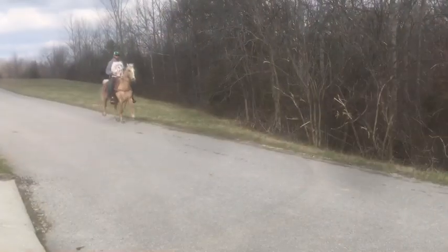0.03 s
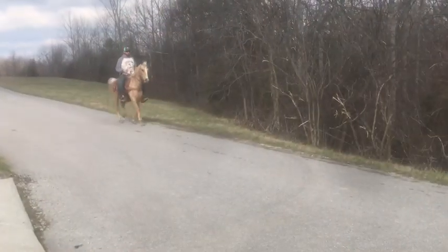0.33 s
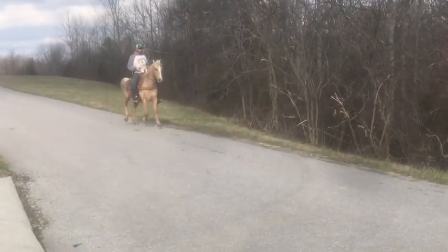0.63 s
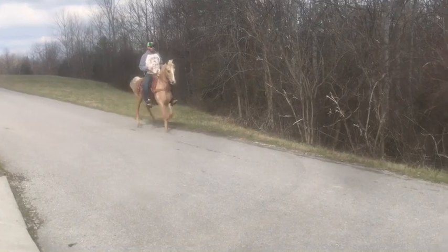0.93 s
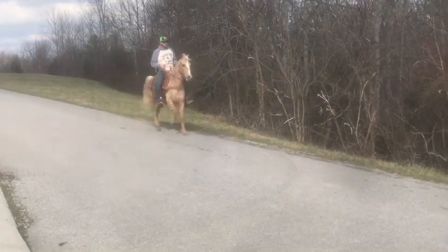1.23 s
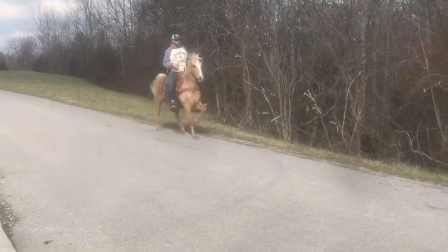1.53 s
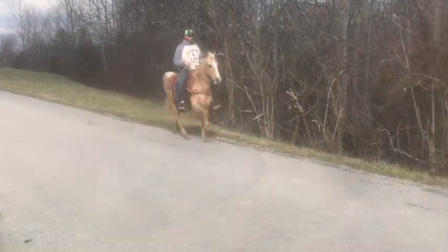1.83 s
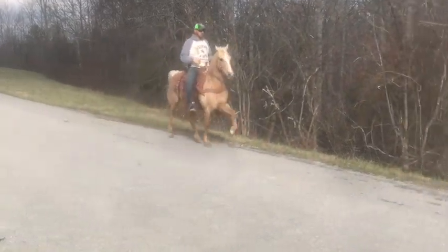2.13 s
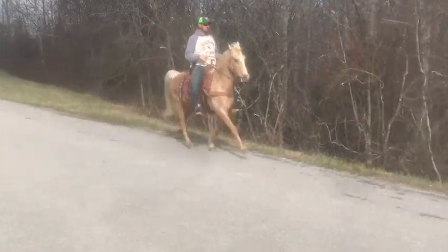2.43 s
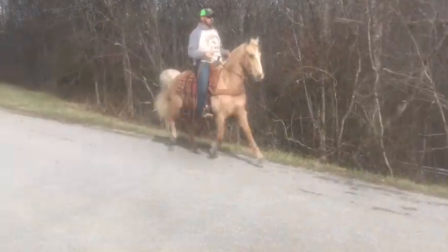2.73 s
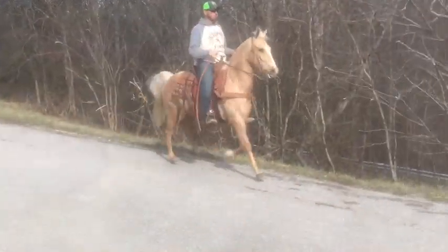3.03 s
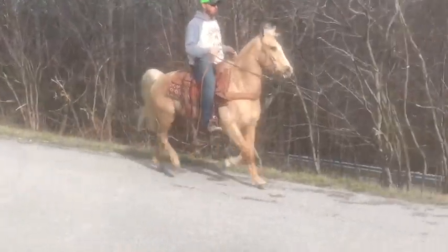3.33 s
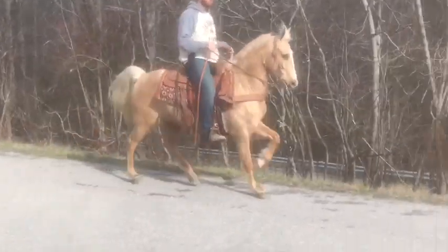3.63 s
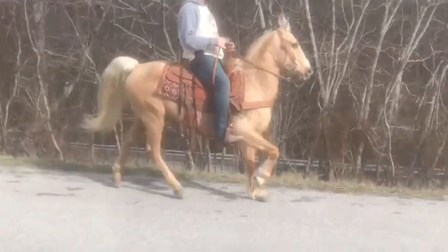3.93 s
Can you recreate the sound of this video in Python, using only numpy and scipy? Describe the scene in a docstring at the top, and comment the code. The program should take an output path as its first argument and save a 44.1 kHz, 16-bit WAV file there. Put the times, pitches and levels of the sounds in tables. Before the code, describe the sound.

A horse's hooves clip-clop at a quick, even pace on a paved road outdoors, growing louder as it approaches. Wind gusts buffet the microphone early on, then thin out, while harness and loose grit tick faintly between steps.

```python
"""A horse comes up an asphalt road at a quick, even gait; at first, gusts buffet the microphone.
Each hoof ticks down with its toe, scuffs, then slaps flat: a thud, a hollow cup of air, a ring of horn.
The wood beside the road answers; tack and loose grit tick between steps.
The gusts thin out, and the steps grow louder and drier until the horse is close by."""
import sys
import numpy as np
from scipy import signal
from scipy.fft import rfft, irfft, next_fast_len
from scipy.io import wavfile
from scipy.ndimage import uniform_filter1d

SR = 44100
rng = np.random.default_rng(int(sys.argv[2]) if len(sys.argv) > 2 else 0)


def master(y):
    """Save y as 16-bit WAV."""
    cut = np.clip(np.atleast_2d(y).T, -1, 1)
    pcm = np.round(cut * 32767)  # scale
    wavfile.write(sys.argv[1], SR, pcm.astype(np.int16))


N = 176400

# Spectrum of a hard snap: freq_hz, level_db
CRACK_SPECTRUM = [(300, -88), (1200, 0.5), (2600, 9), (4500, 2), (8000, -9), (10500, -21.5), (16000, -34)]
# Spectrum of crunching grit: freq_hz, level_db
GRIT_SPECTRUM = [(120, -29.5), (250, 3), (650, 0.5), (1300, 4), (2100, -11), (2700, -13), (7500, -40)]


def amp(db):
    """Decibels to gain."""
    return 10 ** (np.asarray(db) / 20)


def unit(x):
    """Scale to rms 1."""
    return x / np.sqrt(np.mean(x ** 2) + 1e-20)


def bin_gains(spectrum, size):
    """Gain per FFT bin, interpolated over log frequency."""
    freq_hz, level_db = np.transpose(spectrum)
    bin_hz = np.fft.rfftfreq(size, 1 / SR)
    return amp(np.interp(np.log(bin_hz + 1), np.log(freq_hz + 1), level_db))


def add(track, start_s, sound):
    """Mix a sound into a track."""
    i = int(np.clip(round(start_s * SR), 0, N))
    track[i:i + len(sound)] += sound[:N - i]


def coloured(x, spectrum):
    """Minimum-phase filter of unit energy."""
    size = 2048
    cepstrum = irfft(np.log(bin_gains(spectrum, size)))
    cepstrum[1:size // 2] *= 2
    cepstrum[size // 2 + 1:] = 0
    impulse = irfft(np.exp(rfft(cepstrum)))
    return signal.fftconvolve(x, impulse / np.linalg.norm(impulse))[:len(x)]


def noise(spectrum):
    """Steady coloured noise of rms 1."""
    return unit(irfft(rfft(rng.standard_normal(N)) * bin_gains(spectrum, N), N))


def fade(t, t60_s):
    """Exponential decay."""
    return np.exp(-np.log(1000) * t / t60_s)


def burst(t, t60_s):
    """Decaying white noise."""
    return rng.standard_normal(len(t)) * fade(t, t60_s)


def horse():
    """Steps and their echoes, drier as the horse nears."""
    # Hoof falls: toe_s, sole_s, tick_db, crack_db, thud_db, cup_db, horn_db, scuff_db,
    # thud_hz, cup_hz, horn_hz, horn_decay_s
    hoof_falls = [(.034, .0428, -34.5, -31, -34, -41, -24.5, -37.5, 202, 590, 962, 0.034),
                  (0.181, 0.186, -33, -34, -54, -62, -27.5, -44, 302, 706, 1310, 0.013),
                  (0.314, 0.318, -34, -29, -27.5, -52, -20.5, -35, 202, 645, 1320, 0.017),
                  (0.439, 0.4462, -30.5, -32, -50, -60, -47, -45, 300, 680, 1380, 0.018),
                  (0.5793, 0.5865, -41, -38, -44, -54, -34, -39, 200, 590, 920, 0.047),
                  (.713, 0.714, -33, -37, -26.5, -29, -33.5, -43, 265, 590, 1230, 0.041),
                  (0.8405, 0.8463, -35.5, -39, -24.5, -36, -24, -36.5, 318, 647, 931, 0.027),
                  (.953, .9556, -38, -36.5, -9.5, -28, -32.5, -39.5, 303, 644, 1310, 0.02),
                  (1.111, 1.1218, -42, -53, -31, -23, -20.5, -30, 403, 645, 970, 0.018),
                  (1.2548, 1.2572, -35.5, -30.5, -13.5, -28, -24, -41, 292, 613, 1199, 0.035),
                  (1.3577, 1.3717, -48, -50, -26.5, -29, -33.5, -37, 400, 613, 1290, 0.012),
                  (1.5073, 1.514, -31.5, -46, -15, -23.5, -28, -35, 267, 590, 1276, 0.011),
                  (1.611, 1.625, -40, -29.5, -27.5, -25.5, -16.5, -31.5, 201, 595, 1010, 0.013),
                  (1.77, 1.772, -31.5, -20, -20.5, -50, -18.5, -32, 283, 800, 1202, 0.034),
                  (1.873, 1.887, -36.5, -39, -30, -38, -36, -32.5, 225, 564, 1150, 0.025),
                  (2.0069, 2.021, -25, -33, -18, -38, -21.5, -35, 343, 697, 1480, 0.0086),
                  (2.155, 2.164, -39, -33.5, -25, -32, -22, -32.5, 230, 740, 900, 0.021),
                  (2.2904, 2.2918, -29.5, -26, -17, -30, -18.5, -30.5, 373, 790, 1090, 0.033),
                  (2.399, 2.4136, -31.5, -32, -34, -24, -37, -32, 348, 638, 910, 0.013),
                  (2.523, 2.529, -29.5, -33, -18, -23, -21.5, -29.5, 273, 714, 790, 0.0086),
                  (2.6765, 2.6863, -32.5, -35.5, -21.5, -23, -30, -29.5, 350, 626, 926, 0.026),
                  (2.8094, 2.8097, -23.5, -24, -12, -20.5, -20, -31.5, 291, 686, 1175, 0.019),
                  (2.9165, 2.9272, -32, -28.5, -23, -19, -32, -29.5, 404, 588, 1080, 0.0087),
                  (3.0678, 3.0702, -23.5, -33, -10, -18, -21, -29.5, 212, 687, 1130, 0.012),
                  (3.1675, 3.185, -33.5, -33.5, -15.5, -15, -19, -26, 277, 698, 910, 0.018),
                  (3.3276, 3.3316, -21, -21, -8, -15, -14.5, -31, 275, 640, 1176, 0.026),
                  (3.467, 3.4788, -24, -25, -16, -16.5, -20, -26, 348, 655, 995, .028),
                  (3.604, 3.6143, -30, -36, -13.5, -15.5, -18.5, -29.5, 271, 647, 1163, 0.022),
                  (3.7125, 3.7232, -35, -25.5, -16, -16, -10, -29, 195, 720, 1058, 0.016),
                  (3.8734, 3.8888, -16.5, -30.5, -9, -15.5, -13.5, -41, 310, 612, 1068, 0.03),
                  (3.987, 3.995, -38, -29.5, -18, -14.5, -22.5, -28.5, 360, 586, 980, 0.02)]
    far_echo_db, near_echo_db = -9, -15
    out = np.zeros(N)
    for toe_s, sole_s, *settings in hoof_falls:
        step = hoof_fall(sole_s - toe_s, *settings)
        echo_db = np.interp(toe_s, [0, N / SR], [far_echo_db, near_echo_db])
        add(out, toe_s, step)
        add(out, toe_s, amp(echo_db) * trees(step))
    return out


def hoof_fall(roll_s, tick_db, crack_db, thud_db, cup_db, horn_db, scuff_db, *tuning):
    """The toe ticks and sets the hoof ringing; roll_s later the sole slaps flat."""
    t = np.arange(SR // 10) / SR
    sole_t = np.maximum(t - roll_s, 0)
    toe_ring = hoof_body(t, *tuning, thud_db=7.5, cup_db=0, horn_db=0)
    toe = amp(tick_db - 3.5) * toe_ring * fade(t, t60_s=0.039)
    sole = hoof_body(sole_t, *tuning, thud_db, cup_db, horn_db)
    tick = amp(tick_db) * burst(t, t60_s=0.007)
    crack = amp(crack_db) * burst(sole_t, t60_s=0.013) * (sole_t > 0)
    return toe + sole + coloured(tick + crack, CRACK_SPECTRUM) + amp(scuff_db) * scuff(t, roll_s)


def hoof_body(t, thud_hz, cup_hz, horn_hz, horn_decay_s, thud_db, cup_db, horn_db):
    """Thud of the weight, air cupped under the sole, its blunt slap and the modes of the horn."""
    # Further hoof modes: pitch_hz, level_re_horn_db, decay_s
    overtones = [(1369, -3.5, 0.01), (1673, -11.5, 0.025), (2553, -11.5, 0.016)]
    thud_cycles, scatter_db, detune = 7, 1.5, 0.05
    thud = amp(thud_db) * ring(t, thud_hz, thud_cycles / thud_hz, attack_s=0.0025)
    cup = amp(cup_db) * ring(t, cup_hz, decay_s=0.023)
    slap = amp(horn_db + 2) * ring(t, pitch_hz=1026, decay_s=0.0041, attack_s=0.0002)
    horn = amp(horn_db) * ring(t, horn_hz, horn_decay_s)
    for pitch_hz, level_db, decay_s in overtones:
        pitch_draw, level_draw = rng.standard_normal(2)
        gain = amp(horn_db + level_db + scatter_db * level_draw)
        horn += gain * ring(t, pitch_hz * (1 + detune * pitch_draw), decay_s)
    return thud + cup + slap + horn


def ring(t, pitch_hz, decay_s, attack_s=0.0004):
    """One mode, choked ever faster as the hoof takes the weight."""
    load_exponent = 1.58
    choke = fade((t / decay_s) ** load_exponent, 0.65)
    return -np.sin(2 * np.pi * pitch_hz * t) * choke * (1 - np.exp(-t / attack_s))


def scuff(t, roll_s):
    """Grit crunches and fine sand scrapes, most once the sole is down."""
    grains_per_s, spread_db = 2600, 5
    toe_only_db, hold_s = -6, 0.0091
    sand_db, sand_top_hz = -16, 6100
    shape = (2, len(t))
    sizes = amp(spread_db * np.clip(rng.standard_normal(shape), -2, 2))
    hits = rng.random(shape) < grains_per_s / SR
    grains = sizes * hits * np.sign(rng.standard_normal(shape))
    release = fade(np.maximum(t - roll_s - hold_s, 0), t60_s=0.042)
    coarse, fine = unit(grains) * amp(toe_only_db * (t < roll_s)) * release
    sand = signal.lfilter(*signal.butter(2, sand_top_hz, fs=SR), coloured(fine, CRACK_SPECTRUM))
    return coloured(coarse, GRIT_SPECTRUM) + amp(sand_db) * sand


def trees(step):
    """Countless trunks each send back a faint copy of the step, blurred in pitch."""
    # Echo colour: freq_hz, level_db
    echo_spectrum = [(300, -11), (750, -4.5), (1100, -4), (1700, -4), (6000, -1)]
    trunks_per_s, build_s, blur_hz = 1500, 0.029, 191
    t = np.arange(SR // 2) / SR
    reflections = burst(t, t60_s=0.34) * (rng.random(len(t)) < trunks_per_s / SR)
    reflections *= 1 - np.exp(-(t / build_s) ** 2)
    blurred_power = uniform_filter1d(np.abs(rfft(step, len(t))) ** 2, int(blur_hz * len(t) / SR))
    echo = irfft(rfft(reflections / np.linalg.norm(reflections)) * np.sqrt(np.abs(blurred_power)))
    return coloured(echo, echo_spectrum)


def tack():
    """Small ticks and knocks of harness and saddle."""
    # Tack knocks: start_s, level_db
    knocks = [(.128, -40.5), (0.644, -38), (1.446, -38), (1.712, -33.5), (2.21, -39.5), (2.745, -36),
              (3.008, -33.5), (3.271, -29), (3.8186, -35.5), (3.8317, -38)]
    t60_s, tick_db = 0.032, -8.5
    out, t = np.zeros(N), np.arange(SR // 10) / SR
    for start_s, level_db in knocks:
        tick = amp(tick_db) * coloured(burst(t, t60_s), CRACK_SPECTRUM)
        knock = coloured(burst(t, t60_s), GRIT_SPECTRUM)
        add(out, start_s, amp(level_db) * (tick + knock))
    return out


def wind():
    """A breeze and short gusts buffet the microphone; the swirl gains in strong gusts."""
    # Breeze strength: time_s, level_db
    breeze = [(0, -40), (.9, -34.5), (1.4, -46), (2.2, -41.5), (2.7, -55.5), (3.2, -47.5), (3.7, -37.5),
              (3.95, -55.5)]
    # Gusts: centre_s, peak_db
    gusts = [(.037, -28), (0.292, -24), (0.519, -23.5), (.609, -24.5), (.804, -22.5), (.961, -28),
             (1.22, -32.5), (1.948, -28.5), (3.408, -36.5)]
    # Low buffeting: freq_hz, level_db
    rumble_spectrum = [(20, -32), (55, 1.5), (80, -2), (130, -7.5), (220, -20), (600, -92)]
    # Upper buffeting: freq_hz, level_db
    swirl_spectrum = [(60, -9), (150, 9.5), (320, -3), (600, -24), (1500, -91)]
    gust_sigma_s = 0.017
    strong_db, swirl_db, swirl_exponent = -16, -13.5, 1.1
    t = np.arange(N) / SR
    force = amp(np.interp(t, *np.transpose(breeze)))
    for centre_s, peak_db in gusts:
        gust = amp(peak_db) * np.exp(-((t - centre_s) / gust_sigma_s) ** 2 / 2)
        force = np.hypot(force, gust)
    swirl = amp(strong_db + swirl_db) * (force / amp(strong_db)) ** swirl_exponent
    return force * noise(rumble_spectrum) + swirl * noise(swirl_spectrum)


def air():
    """Steady hush of still outdoor air."""
    # Hush: freq_hz, level_db
    air_spectrum = [(60, 1.5), (200, 10.5), (450, -13), (1100, -3), (2000, -13), (4000, -19.5),
                    (12000, -36.5)]
    return amp(-52) * noise(air_spectrum)


def loose_grit():
    """Grit kicked along the road ticks faintly, louder as the horse nears."""
    ticks_per_s, start_db, rise_db_per_s, spread_db = 41, -48.5, 2, 6.5
    t = np.arange(N) / SR
    level_db = start_db + rise_db_per_s * t + spread_db * np.clip(rng.standard_normal(N), -2, 2)
    hits = rng.random(N) < ticks_per_s / SR
    return coloured(hits * amp(level_db), CRACK_SPECTRUM)


def scene():
    """All sources, mono."""
    return (horse() + tack() + wind() + air() + loose_grit())[None]


def record(dry):
    """Brick-wall low-pass."""
    top_hz = 16200
    size = next_fast_len(N + SR // 2)
    passband = np.fft.rfftfreq(size, 1 / SR) < top_hz
    return irfft(rfft(dry, size) * passband, size)[:, :N]


dry = scene()
out = record(dry)
master(out)
```